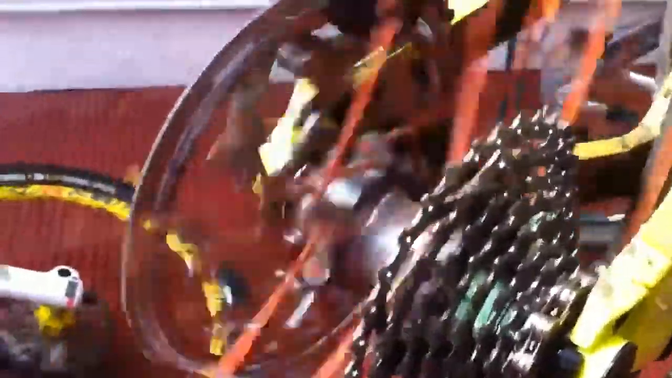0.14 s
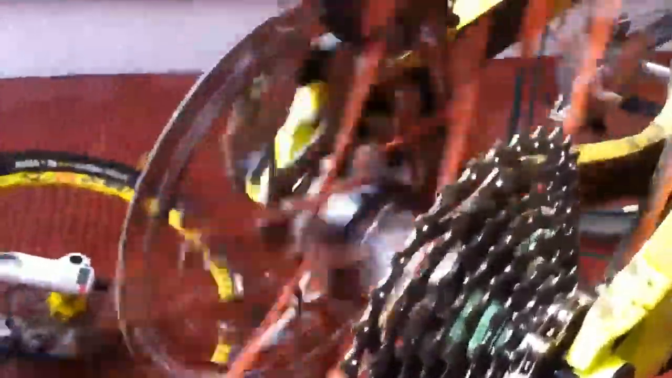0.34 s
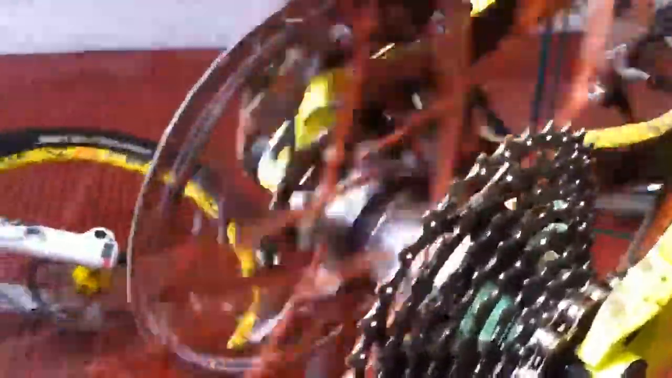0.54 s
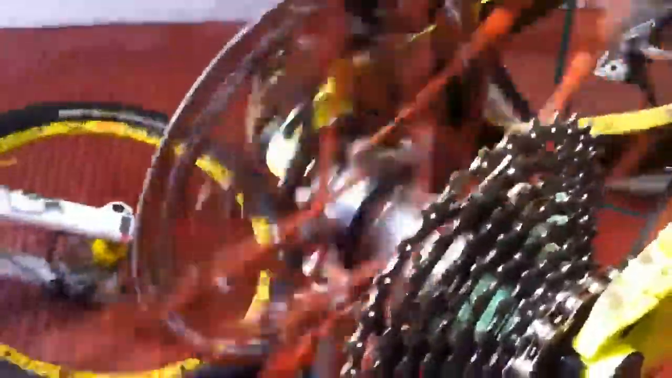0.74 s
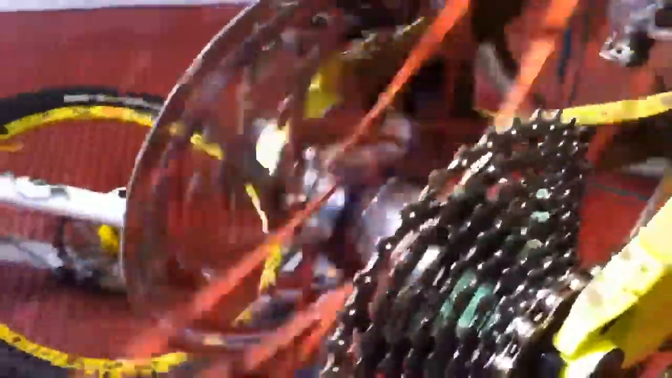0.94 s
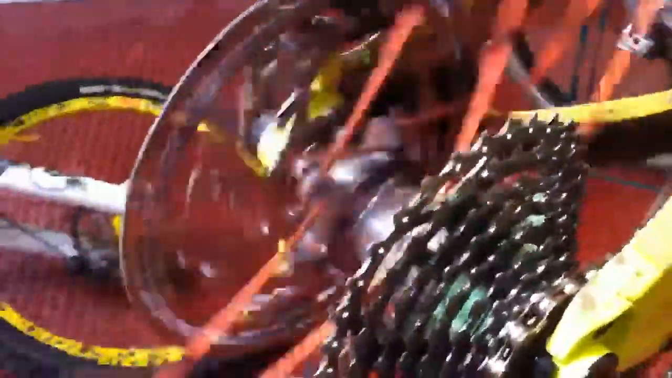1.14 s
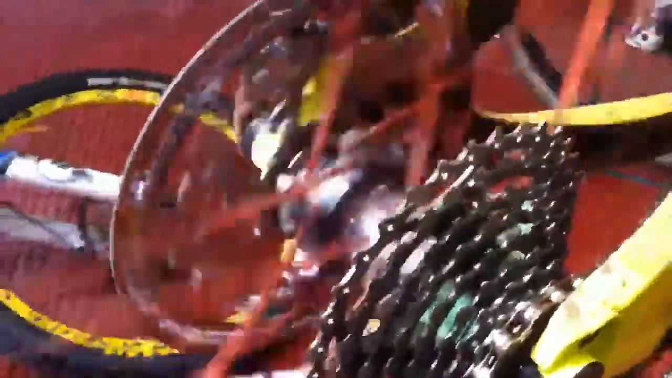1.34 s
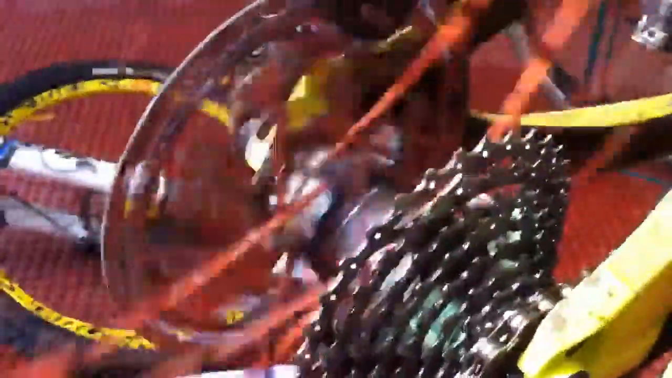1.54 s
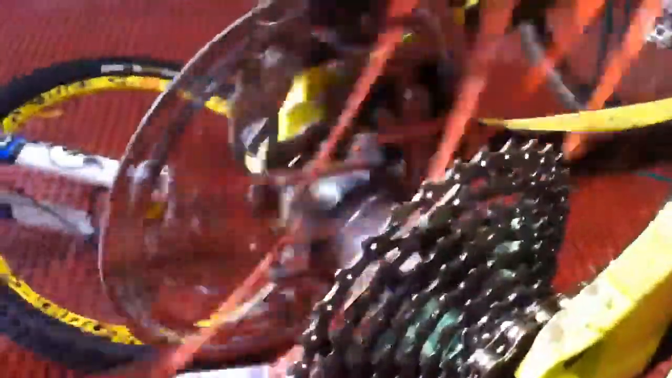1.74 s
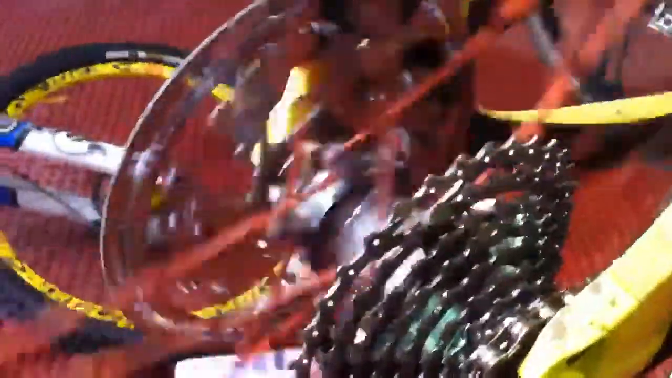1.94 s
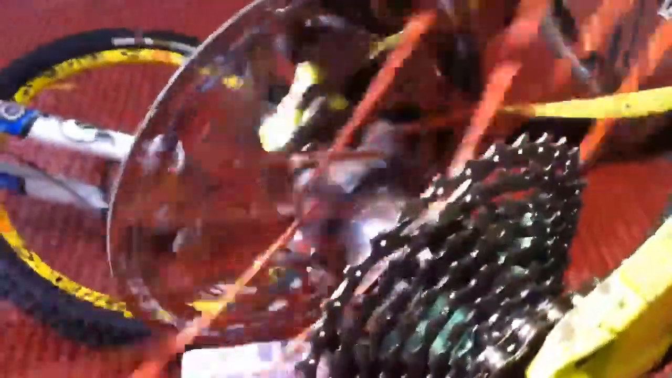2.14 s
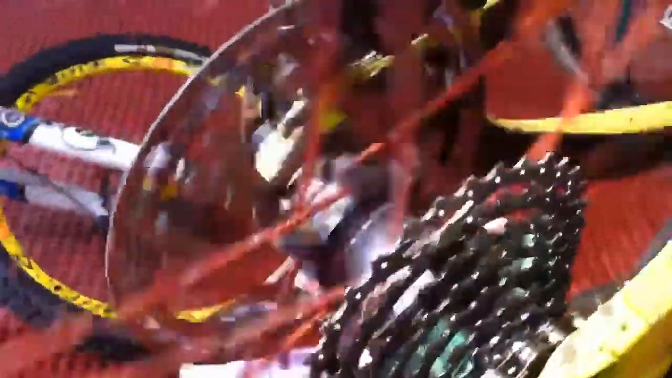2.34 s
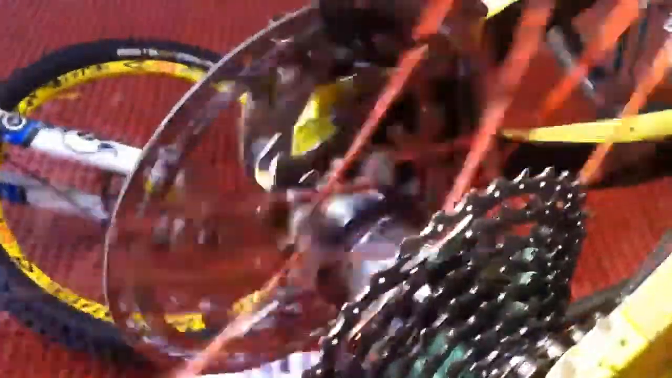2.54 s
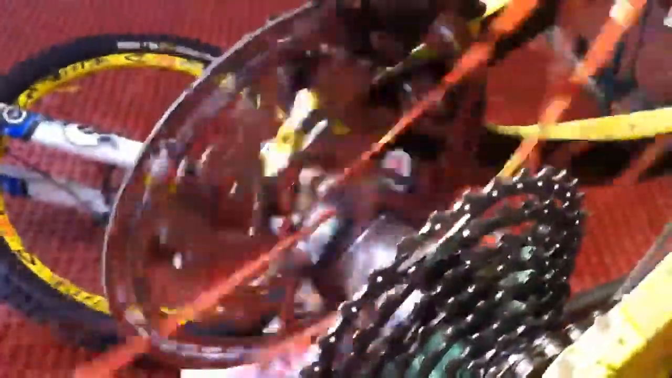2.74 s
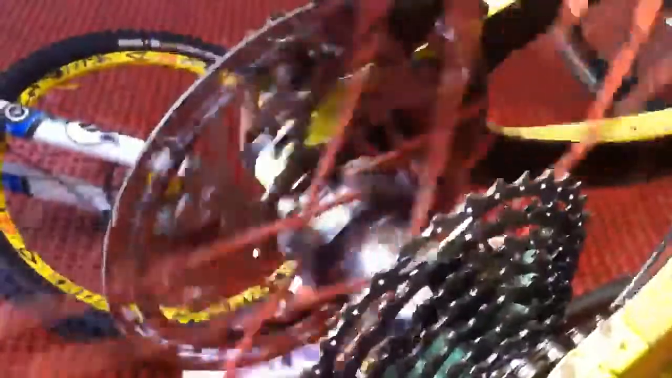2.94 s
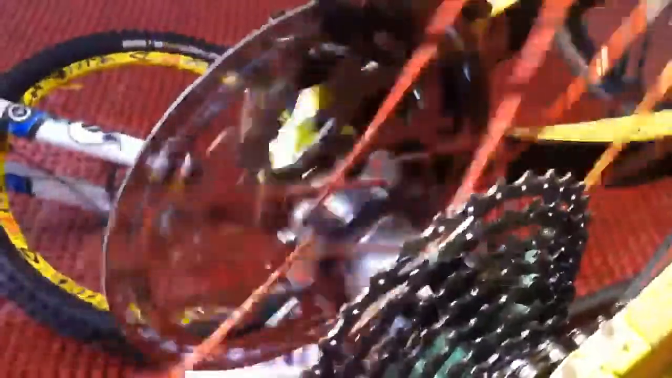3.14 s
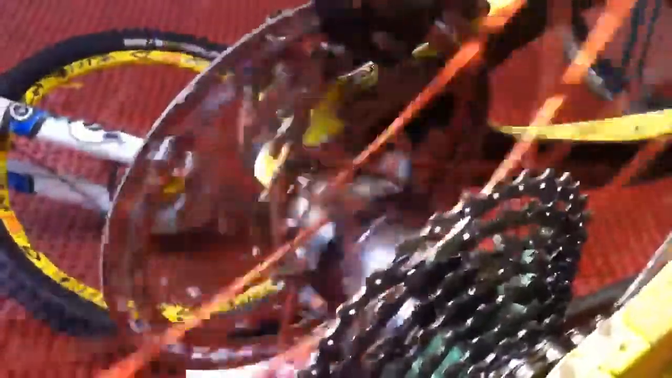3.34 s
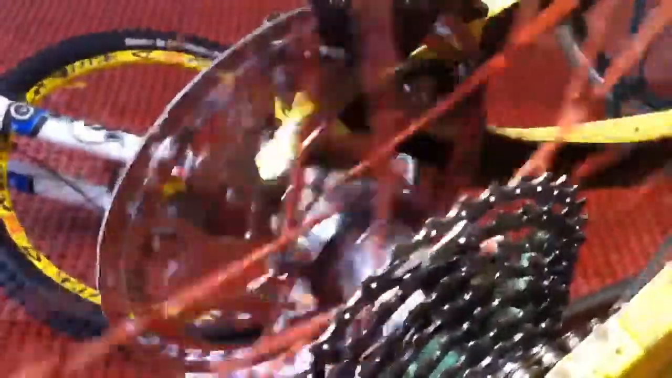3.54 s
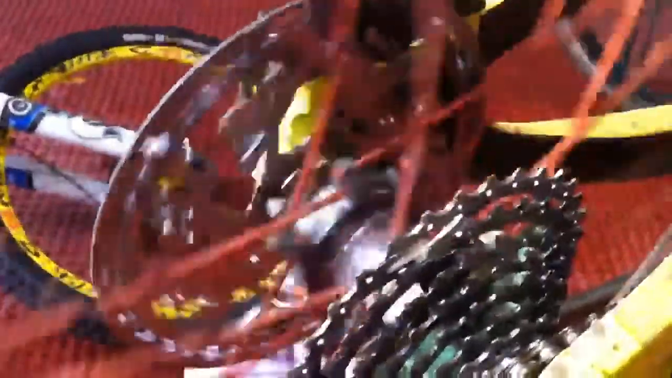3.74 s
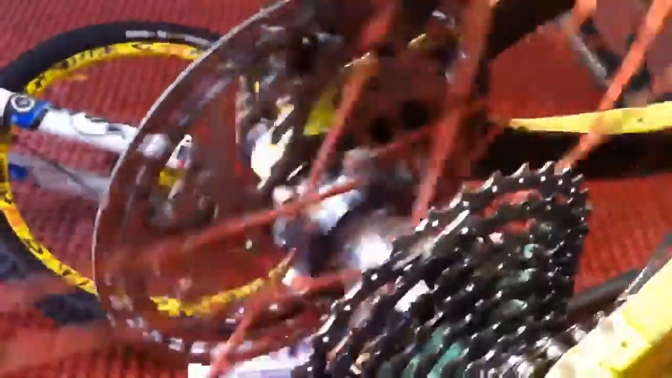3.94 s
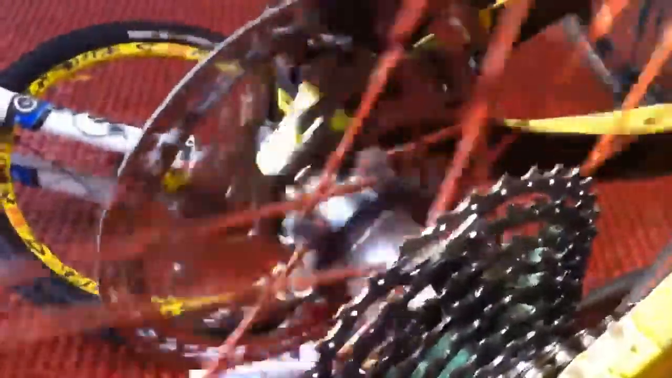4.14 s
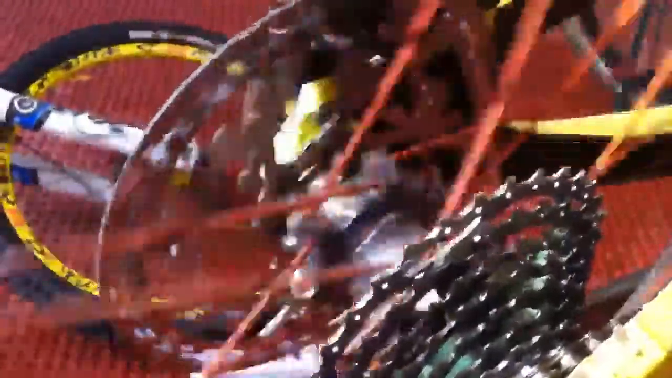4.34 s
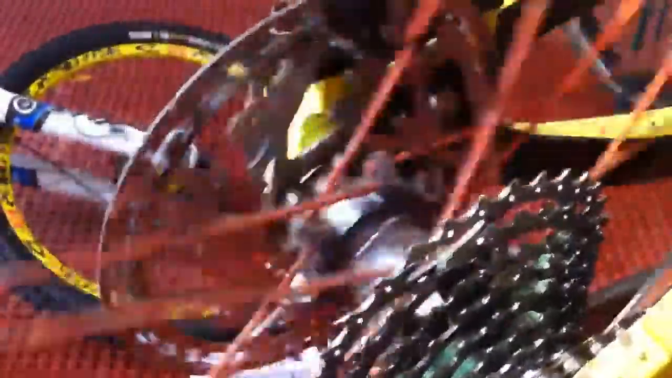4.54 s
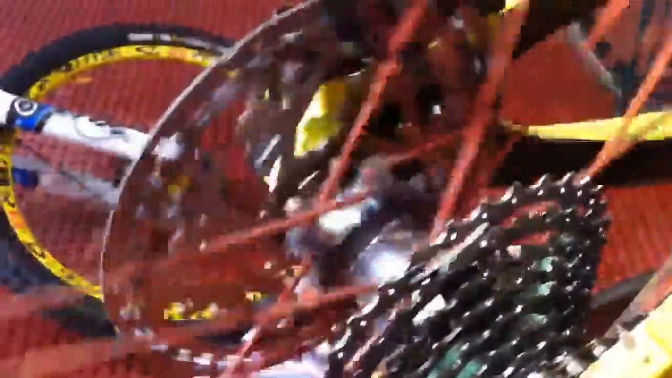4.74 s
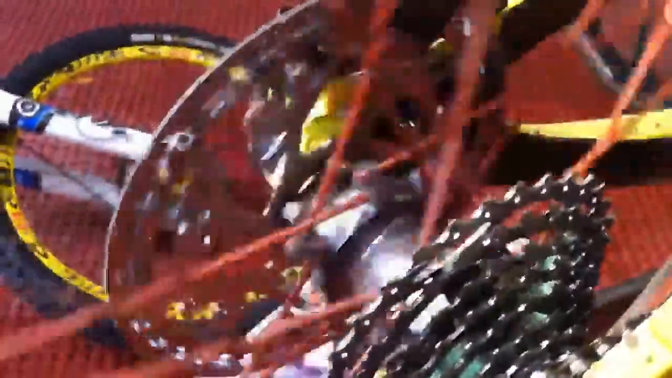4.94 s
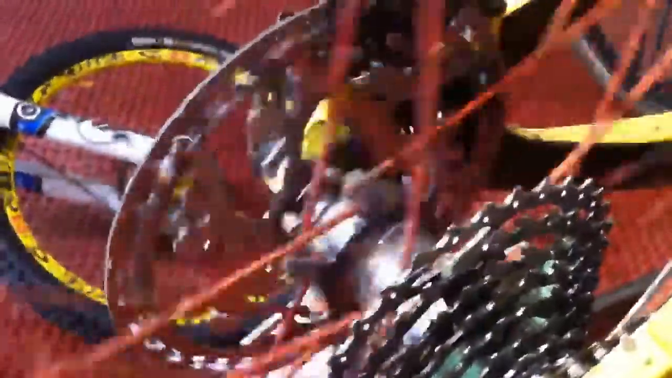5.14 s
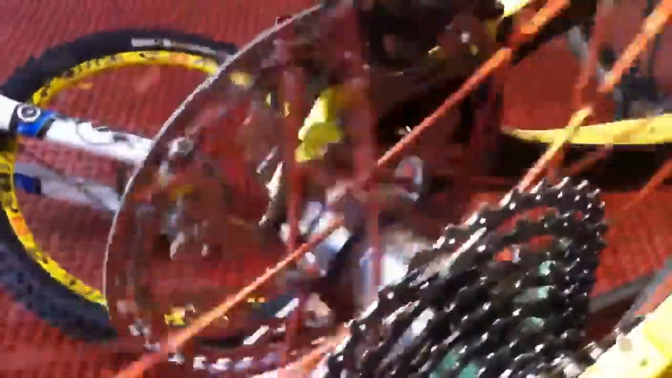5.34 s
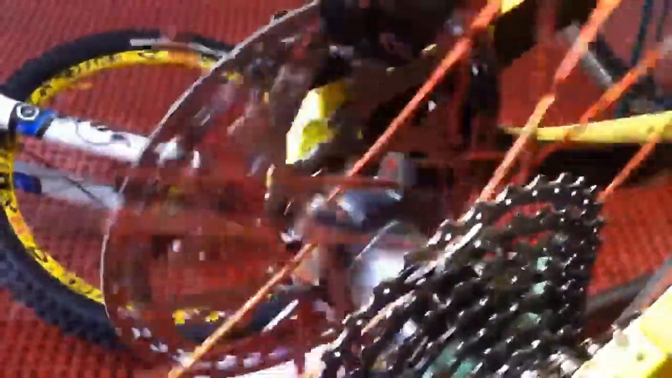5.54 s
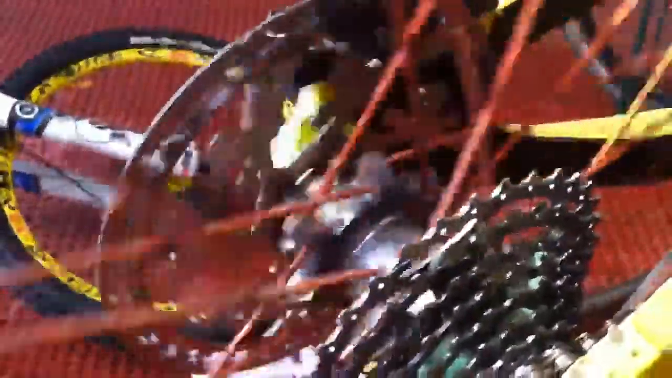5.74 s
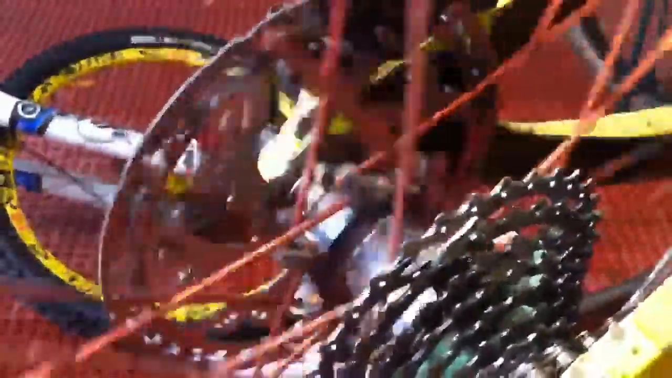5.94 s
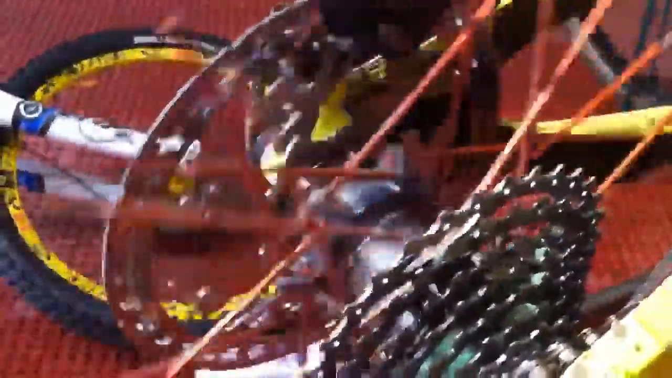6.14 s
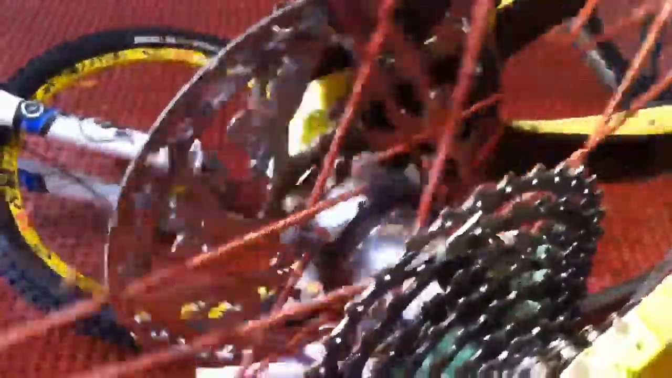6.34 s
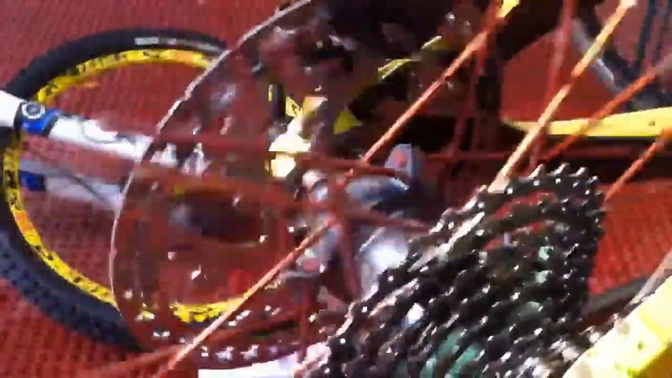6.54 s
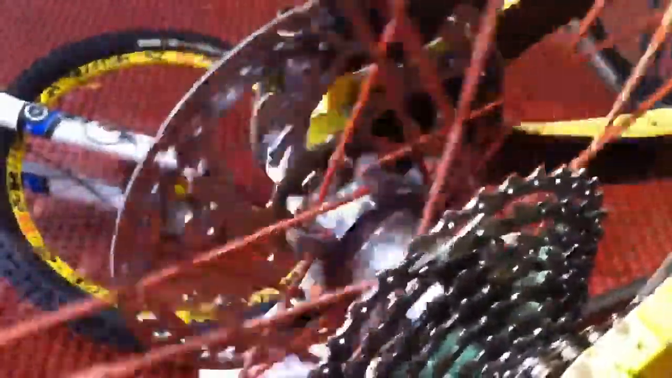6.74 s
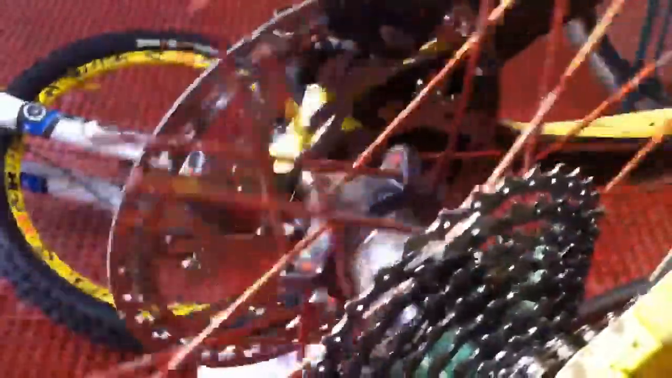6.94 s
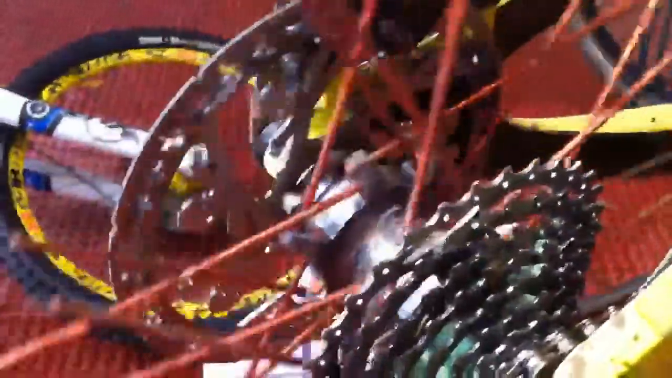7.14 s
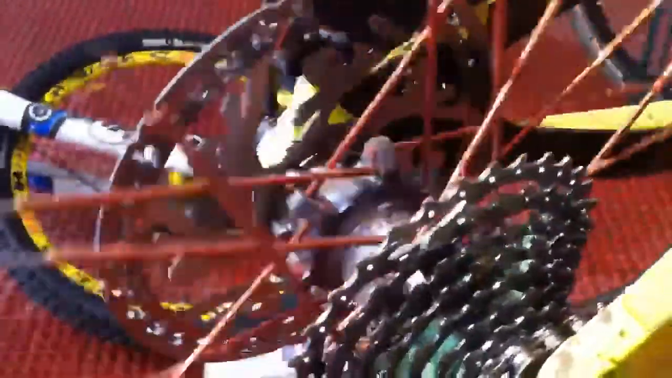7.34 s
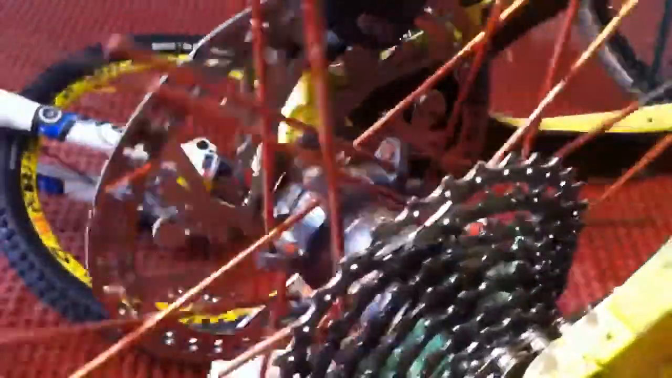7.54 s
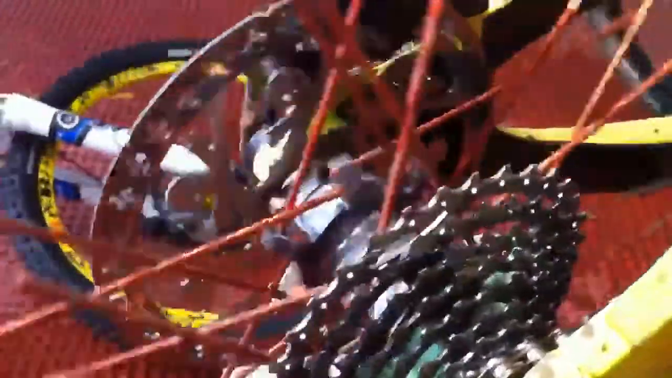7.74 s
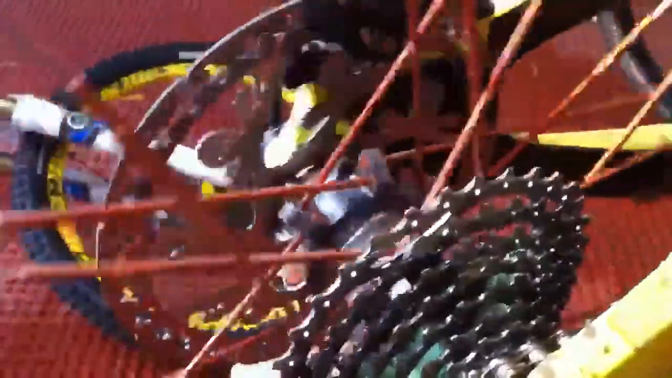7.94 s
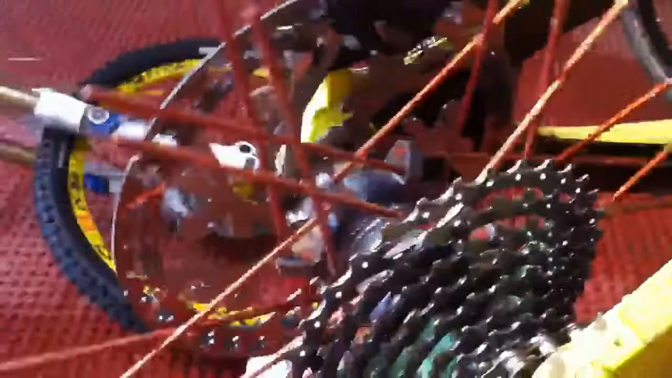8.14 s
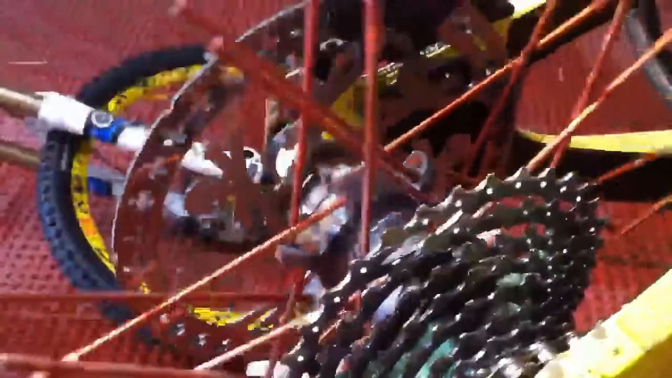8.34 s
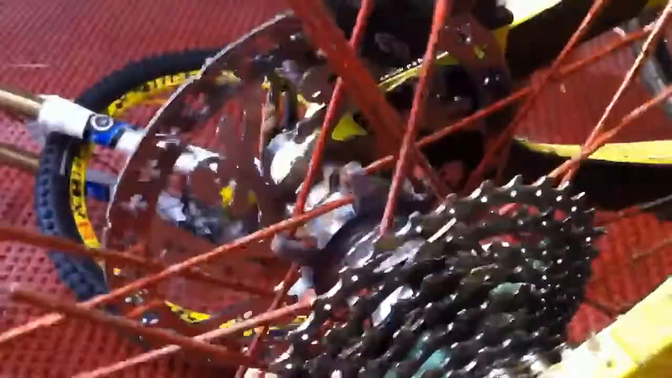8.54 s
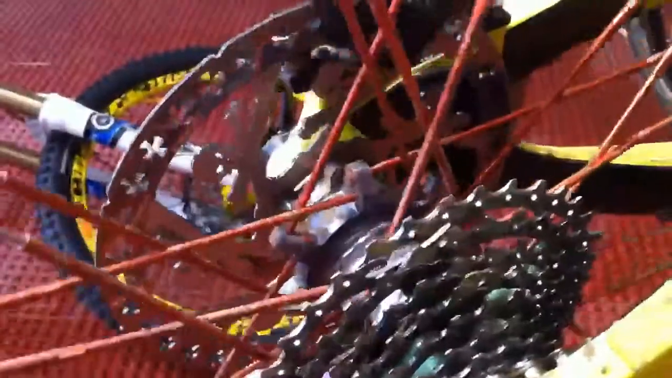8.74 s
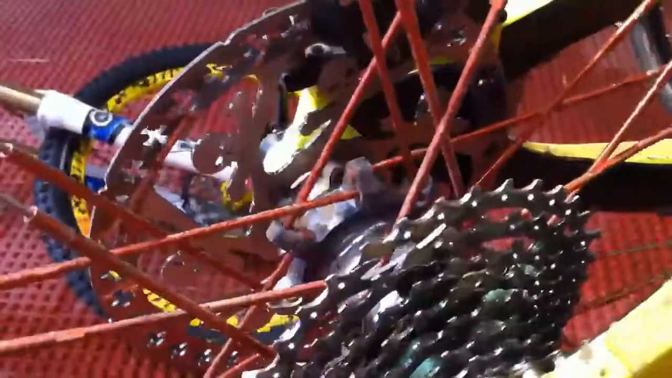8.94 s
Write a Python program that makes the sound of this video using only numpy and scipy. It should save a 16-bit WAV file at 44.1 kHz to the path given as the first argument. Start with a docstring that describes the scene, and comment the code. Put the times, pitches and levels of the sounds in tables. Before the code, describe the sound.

In a quiet workshop, a spinning bicycle wheel winds down, heard up close. The freewheel begins as a dense buzz of crisp, ringing clicks, which gradually loosen into distinct, slightly uneven ticks and finally run out. A few faint shuffles pass in the first half. Steady air noise, a low electrical hum and a faint motor whine lie underneath throughout.

```python
"""A bicycle wheel coasting down

A rear wheel spins on a stand, close by, and slows almost to a stop. Small sprung catches (pawls) drop
off the 48 teeth of its ratchet: first a buzz, then separate ticks. Each drop rings the hub and the steel
sprockets; about twice a turn the pawls strike a 2 kHz ring harder. Behind it the workshop hums and
hisses, with a faint motor whine and a few soft rubs."""
import sys
import numpy as np
from scipy import signal
from scipy.fft import rfft, irfft
from scipy.io import wavfile
from scipy.ndimage import uniform_filter1d

SR = 44100
rng = np.random.default_rng(int(sys.argv[2]) if len(sys.argv) > 2 else 0)


def generate_wav(signal):
    """Clip the signal to [-1, 1] and save it as 16-bit WAV at the path in sys.argv[1]."""
    frames = np.transpose(np.atleast_2d(signal))
    scaled = np.clip(frames, -1, 1) * 32767
    pcm = np.round(scaled).astype(np.int16)
    wavfile.write(sys.argv[1], SR, pcm)


N = 400428
TEETH_PER_TURN = 48
LEAD_IN_S = .004  # a faint swell begins this long before each click


def gain(db):
    """Turn decibels into a number to multiply by."""
    return 10 ** (np.asarray(db) / 20)


def at_level(x, db):
    """Scale a sound to an average (rms) level."""
    return x * gain(db) / np.sqrt(np.mean(x ** 2))


def colour(x, points):
    """Shape the tone along (pitch_hz, gain_db) points, with a filter that never rings ahead of a hit."""
    hz, db = np.transpose(points)
    grid_hz = np.maximum(np.fft.rfftfreq(4096, 1 / SR), 1)
    curve_db = np.interp(np.log(grid_hz), np.log(hz), db)
    cepstrum = irfft(np.log(gain(curve_db)))
    half = len(cepstrum) // 2
    folded = np.r_[cepstrum[0], 2 * cepstrum[1:half], np.zeros(half)]  # moves all ringing after the hit
    return signal.fftconvolve(x, irfft(np.exp(rfft(folded))))[:len(x)]


def fade(decay_s):
    """Half a second of dying away, falling 60 dB every decay_s."""
    return np.exp(-np.log(1000) * np.arange(SR // 2) / SR / decay_s)


def ringing(tones):
    """An object's answer to one tap: fading tones, given as (pitch_hz, decay_s, energy_db)."""
    t = np.arange(SR // 2) / SR
    return sum(gain(db) / np.sqrt(decay_s) * fade(decay_s) * np.cos(2 * np.pi * hz * t)
               for hz, decay_s, db in tones)


def strike(force, response):
    """A force sets an object ringing; a blow of size 1 has the energy of 10 ms at full scale."""
    energy = SR / 100
    return signal.fftconvolve(force, response * np.sqrt(energy / np.sum(response ** 2)))[:N]


def place(times, shapes):
    """Add one short shape (a row) at each time, in seconds."""
    out = np.zeros(N + SR)
    starts = (np.maximum(times, 0) * SR).astype(int)
    np.add.at(out, starts[:, None] + np.arange(shapes.shape[1]), shapes)
    return out[:N]


def wander(rate_hz):
    """A smooth random drift, typically about 1 in size."""
    hold = int(SR / rate_hz)
    steps = np.repeat(rng.standard_normal(N // hold + 1), hold)
    return at_level(uniform_filter1d(uniform_filter1d(steps, hold), hold)[:N], 0)


# The tone of the workshop air and microphone hiss: pitch_hz, gain_db
AIR_COLOUR = [(25, -31), (75, -32), (130, -5.5), (230, 2), (470, -3), (640, 1.5), (1000, -4), (1900, 1),
              (3400, -13), (5500, -10), (7900, -3), (9800, -13), (12500, -23), (16000, -26)]
def air(level_db=-45):
    """Air and hiss make a steady bed of noise."""
    return at_level(colour(rng.standard_normal(N), AIR_COLOUR), level_db)


# The tones of a low electrical hum and a faint motor whine: pitch_hz, level_db
HUM_AND_WHINE_TONES = [(120, -66), (177, -67), (240, -64), (600.5, -65.5), (1435.5, -73), (1663, -73)]
def hum_and_whine(sway_db=2.6):
    """A low electrical hum with a faint motor whine, each tone wavering a little in loudness."""
    t = np.arange(N) / SR
    return sum(at_level(np.sin(2 * np.pi * hz * t) * gain(sway_db * wander(rate_hz=8.6)), db)
               for hz, db in HUM_AND_WHINE_TONES)


# Soft rubs and shuffles: middle_s, level_db, pitch_hz, width_hz, length_s
SOFT_RUBS = [(.92, -47.5, 900, 700, .16), (1.43, -49, 900, 500, .1), (2.96, -47.5, 1150, 700, .1),
             (3.405, -43.5, 385, 110, .09), (3.45, -43.5, 255, 130, .11), (3.49, -44.7, 700, 900, .19),
             (3.48, -51, 130, 220, .17), (3.585, -50, 190, 160, .05)]
def rubs(grain_db=2):
    """Each rub is a grainy swell of friction noise around one pitch."""
    t = np.arange(N) / SR
    out = 0
    for middle_s, db, hz, width_hz, length_s in SOFT_RUBS:
        band = rng.standard_normal(N)
        for sharpness in (hz / width_hz, hz / width_hz / 2):
            band = signal.lfilter(*signal.iirpeak(hz, sharpness, fs=SR), band)
        swell = np.exp(-2 * ((t - middle_s) / length_s) ** 2)
        out = out + at_level(band, db) * swell
    return out * gain(grain_db * wander(rate_hz=70))


# The tone of the echo from the walls: pitch_hz, gain_db
WALL_COLOUR = [(200, 0), (2000, -8), (4000, -4), (6000, 0), (10000, -3), (16000, -9)]
def room(x, echo_db=-17, decay_s=.25):
    """Add faint reflections from the workshop's walls."""
    echo = colour(rng.standard_normal(SR // 2) * fade(decay_s), WALL_COLOUR)
    echo[:SR // 150] = 0  # the first reflection takes about 7 ms to arrive
    return x + gain(echo_db) * signal.fftconvolve(x, echo / np.linalg.norm(echo))[:N]


def pawls(stagger_ms, speed, count=3, lead_in_ms=1.8, contact_ms=.35, chatter_ms=4.2):
    """Each drop's strength over time: after a faint, brief swell the pawls land in turn and chatter."""
    ms = np.arange(SR // 40) * 1000 / SR - 1000 * LEAD_IN_S
    chatter = gain(db=-12 + speed)[:, None]  # slightly more at speed
    power = 0
    for pawl in range(count):
        lag, unevenness = rng.standard_normal((len(stagger_ms), 2)).T
        landing_ms = stagger_ms * pawl / (count - 1) * np.exp(.15 * lag)
        age_ms = ms - landing_ms[:, None]
        lead_in = gain(db=-14) * np.exp(-abs(age_ms) / lead_in_ms)
        landed = np.exp(-abs(age_ms) / contact_ms) + chatter * np.exp(-abs(age_ms) / chatter_ms)
        weight = gain(db=-.5 * unevenness)[:, None]
        power = power + (weight * np.where(age_ms < 0, lead_in, landed)) ** 2
    return np.sqrt(power / power.sum(axis=1, keepdims=True))


def rough_force(strength, tooth_share=.4):
    """Each drop's force is rough; part of that belongs to the tooth and comes back every turn."""
    teeth = rng.standard_normal((TEETH_PER_TURN, strength.shape[1]))
    repeating = teeth[np.arange(len(strength)) % TEETH_PER_TURN]
    fresh = rng.standard_normal(strength.shape)
    return strength * (np.sqrt(tooth_share) * repeating + np.sqrt(1 - tooth_share) * fresh)


def after_ring(starts, strength, decay_s=.075):
    """The shaking after each drop; the wheel has turned a little, so each wakes different tones."""
    tails = rng.standard_normal((len(starts), SR // 10)) * fade(decay_s)[:SR // 10]
    tails = tails / np.linalg.norm(tails, axis=1, keepdims=True)
    return place(starts, signal.fftconvolve(rough_force(strength), tails, axes=1))


# The tone of the spokes and frame: pitch_hz, gain_db
FRAME_COLOUR = [(60, -43), (300, -28), (900, -23), (1700, 4.5), (2100, 17), (2600, 9.5), (3400, -21),
                (4700, 0.5), (5600, 13), (6600, 7), (7800, 15), (9500, 5), (11000, 11), (13000, 6),
                (15500, -45.5)]
def frame(starts, strength):
    """The spokes and frame ring on after each drop."""
    return strike(after_ring(starts, strength), colour(signal.unit_impulse(SR // 2), FRAME_COLOUR))


# The tone of steel hitting steel: pitch_hz, gain_db
CRACK_COLOUR = [(60, -71), (300, -41), (900, -33), (1700, 2), (2500, -7), (3400, -33), (4600, -17),
                (5600, -10), (6400, 3), (7800, 14), (9500, 5), (11000, 13), (13000, 12), (15500, -1.5)]
def crack(starts, strength):
    """The pawls hit the ratchet with a short, bright crack."""
    force = place(starts, rough_force(strength))
    return strike(force, colour(signal.unit_impulse(SR // 2), CRACK_COLOUR))


# The tones of the pawls and their springs: pitch_hz, decay_s, energy_db
SPRING_TONES = [(9870, .017, 0), (11080, .014, -3), (14640, .016, 0), (15300, .009, 1)]
def springs(starts, strength, speed):
    """The pawls and springs sing, louder when the wheel is fast."""
    force = place(starts, rough_force(strength) * speed[:, None])
    return strike(force, ringing(SPRING_TONES))


# The tones of the sprockets and hub shell: pitch_hz, decay_s, energy_db
SPROCKET_TONES = [(2961, .017, -9.4), (4110, .035, -12.5), (4314, .012, -10), (5110, .036, -2.8),
                  (5395, .015, -5.8), (5608, .03, -4.8), (5718, .04, -9.5), (5791, .021, -2.4),
                  (5996, .017, -6.1), (6421, .016, -9.5), (6698, .015, -7), (7335, .013, 0),
                  (7757, .013, -3.7), (7935, .013, -4), (8260, .005, -2.7), (9001, .005, -.8),
                  (9871, .014, -3.5), (10297, .005, -4), (11050, .008, 1.5), (11993, .005, -4.6),
                  (13560, .007, -3), (13850, .007, 0), (14620, .013, 1.8), (15130, .006, 1.5)]
def sprockets(starts, strength, shiver_db=1.5, cutoff_hz=8000):
    """Each drop rings the steel, and the after-ring keeps it shivering."""
    shiver = signal.lfilter(*signal.butter(1, cutoff_hz, fs=SR), after_ring(starts, strength))
    force = place(starts, rough_force(strength))
    return strike(force + gain(shiver_db) * shiver, ringing(SPROCKET_TONES))


# The tones of the hub's low ring: pitch_hz, decay_s, gain_db
HUB_TONES = [(2098, .026, 0), (1900, .025, -14), (2250, .02, -19)]
def hub_ring(times, ring_db, stagger_ms, detune=.014, lead_s=.001):
    """The hub's ring builds as the pawls land, then dies; its pitch shifts a little with how they sit."""
    t = np.arange(SR // 25) / SR
    seating = 1 + detune * rng.standard_normal((len(times), 1))
    rings = 0
    for hz, decay_s, db in HUB_TONES:
        phase = rng.random((len(times), 1))
        rings = rings + gain(db) * fade(decay_s)[:len(t)] * np.sin(2 * np.pi * (hz * seating * t + phase))
    rise_s = (4.3 + .96 * stagger_ms[:, None]) / 1000
    rings = rings * np.sin(np.pi / 2 * np.minimum(t / rise_s, 1)) ** 2
    early_level = np.sqrt(np.mean(rings[:, :SR // 100] ** 2, axis=1, keepdims=True))
    starts = times - lead_s  # just before the click
    return place(starts, rings / early_level * gain(ring_db)[:, None])


# The wheel slowing down: time_s, teeth_per_s
WHEEL_SPEED = [(0.0, 79.78), (2.51, 57.89), (2.66, 56.05), (3.32, 51.13), (3.53, 47.74), (4.21, 43.3),
               (4.77, 36.28), (5.06, 35.08), (5.45, 31.95)]
# How hard the hub is rung around one turn: tooth_number, boost_steps (each worth ring_step_db)
RING_BOOST = [(0, 3.5), (1, 4.8), (2, 2), (4, 1), (6, -3), (9, -2.5), (11.5, -7), (14, -3), (17, 1),
              (19, 3), (21, -3), (23, 4), (25, 5.5), (26, 1), (32, .5), (34, -3), (38, -3), (42, 5.5),
              (45, 3.3), (47, .5)]
def buzz(start_tooth=.81, soft_teeth_per_s=19, ring_step_db=1.3, jitter_ms=.25):
    """List the fast drops, one per tooth; the wheel's speed and angle set how hard each lands."""
    speed_times, teeth_per_s = np.transpose(WHEEL_SPEED)
    t = np.arange(0, speed_times[-1], 1 / SR)
    teeth_passed = start_tooth + np.cumsum(np.interp(t, speed_times, teeth_per_s)) / SR
    tooth = np.arange(1, int(teeth_passed[-1]) + 1)
    times = np.interp(tooth, teeth_passed, t)
    slowness = np.exp(-np.interp(times, speed_times, teeth_per_s) / soft_teeth_per_s)  # 1 at rest
    limp = np.where(tooth % 2, 1, -1)  # every other tooth snaps harder
    # The ratchet sits off-centre, so the snaps are softest around tooth 12.
    off_centre = np.cos(2 * np.pi * (tooth - 12) / TEETH_PER_TURN)
    limp_db = -.4 + 7.5 * slowness - .2 * off_centre
    snap_db = -25.3 - 12 * slowness - .4 * off_centre + limp_db * limp
    boost = np.interp(tooth, *np.transpose(RING_BOOST), period=TEETH_PER_TURN)
    ring_db = -36.2 - 5 * slowness + 1.5 * limp + ring_step_db * boost
    stagger_ms = 1.7 + 1.5 * slowness
    time_scatter, snap_scatter, ring_scatter, stagger_scatter = rng.standard_normal((len(tooth), 4)).T
    return np.c_[times + jitter_ms * time_scatter / 1000,
                 snap_db + .87 * snap_scatter,
                 ring_db + 1.55 * ring_scatter,
                 stagger_ms * np.exp(.35 * stagger_scatter)]


# The separate ticks of the slow wheel: start_s, snap_db, ring_db, stagger_ms
# (levels before mixing; stagger is the usual gap from the first pawl landing to the last)
SLOW_TICKS = [(5.4643, -28, -47, 4.4), (5.4974, -28, -37, 1.1), (5.5278, -27, -29.5, 2.5),
              (5.5609, -27.5, -35, 1), (5.5918, -27.5, -43.9, 3.3), (5.6242, -27.5, -39, 2.9),
              (5.6578, -25, -43, 2), (5.6897, -27, -32.5, 3.4), (5.7242, -27, -36.1, 2.2),
              (5.7578, -28, -35.8, 2.9), (5.7917, -25.5, -34.9, 1.9), (5.8287, -27.5, -36, 2.1),
              (5.8626, -26, -39, 1.7), (5.8997, -28, -42, 0.85), (5.9349, -26.5, -32.5, 3.1),
              (5.9738, -28.1, -33.5, 0.68), (6.0111, -27.5, -37.5, 1.9), (6.0506, -28.5, -38.2, 1.4),
              (6.0912, -27.5, -35.2, 2.9), (6.1318, -30, -39.1, 2.3), (6.1748, -28.5, -44, 1.4),
              (6.215, -27.5, -45, 3), (6.2604, -27.5, -35.7, 1.1), (6.3029, -29, -38.8, 3.8),
              (6.3489, -28.5, -30, 2), (6.3926, -31, -31, 3.5), (6.4401, -27.5, -32.5, 1.4),
              (6.4868, -30.5, -30.5, 3.4), (6.5336, -28, -35, 3.9), (6.584, -29, -33.4, 3.2),
              (6.6309, -28, -38, 1.9), (6.6808, -30.5, -35, 3.6), (6.73, -29, -28.5, 4.1),
              (6.7807, -33.5, -35.8, 3.5), (6.8314, -31.1, -29.5, 1), (6.8829, -32.5, -39, 0.57),
              (6.9342, -28.5, -44, 3.8), (6.9864, -32.5, -43, 4.2), (7.0405, -28, -48, 2.4),
              (7.096, -33.5, -42.0, 3.6), (7.151, -30, -36.5, 3.3), (7.2113, -35.5, -41.6, 1.6),
              (7.2692, -31.5, -45.5, 3.5), (7.3332, -33.5, -46, 3.9), (7.3991, -30.5, -42, 2.2),
              (7.4674, -31, -41.0, 2.9), (7.5343, -29.5, -49, 4.3), (7.6117, -33, -44, 1),
              (7.6873, -29.5, -38.4, 1.7), (7.7652, -33, -43.2, 1.1), (7.8435, -31, -33, 2.2),
              (7.9285, -31, -40.9, 1.1), (8.0132, -30, -37.5, 1.7), (8.1018, -33, -36, 2.8),
              (8.1932, -30, -35, 2.7), (8.2991, -32, -48, 0.7), (8.4049, -32.5, -32, 1.5),
              (8.5405, -34.5, -29, 0.6), (8.6893, -35.5, -33, 1.6), (8.9262, -47, -35.5, 3.1),
              (8.9571, -35.5, -43.2, 1.3)]
def freewheel():
    """The pawls drop off tooth after tooth, and every drop sounds all the parts of the wheel."""
    times, snap_db, ring_db, stagger_ms = np.vstack([buzz(), SLOW_TICKS]).T
    stagger_ms = np.maximum(stagger_ms, .3)
    speed = 1 / np.gradient(times) / WHEEL_SPEED[0][1]  # share of the starting speed
    starts = times - LEAD_IN_S
    strength = pawls(stagger_ms, speed) * gain(snap_db)[:, None]
    return (gain(db=-11) * frame(starts, strength)
            + gain(db=-12) * crack(starts, strength)
            + gain(db=-9) * springs(starts, strength, speed)
            + gain(db=-7.5) * sprockets(starts, strength)
            + gain(db=-4.5) * hub_ring(times, ring_db, stagger_ms))


def scene():
    """The wheel in its room, over the workshop's background, in one channel."""
    return (room(freewheel()) + rubs() + air() + hum_and_whine())[None]


def record(dry, cutoff_hz=15850):
    """A steep filter cuts off the highest treble."""
    return signal.sosfilt(signal.ellip(10, .2, 70, cutoff_hz, fs=SR, output="sos"), dry)


dry = scene()
out = record(dry)
generate_wav(out)
```